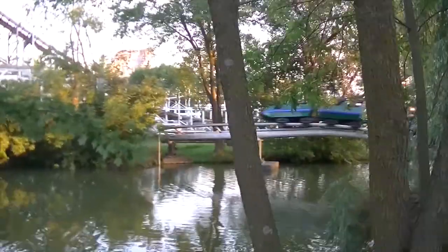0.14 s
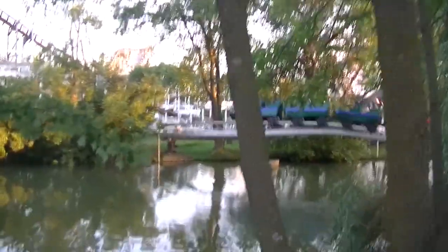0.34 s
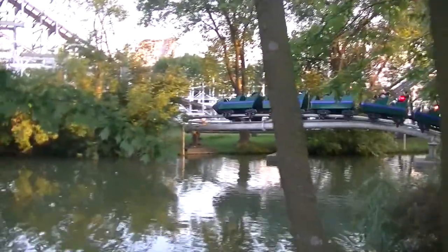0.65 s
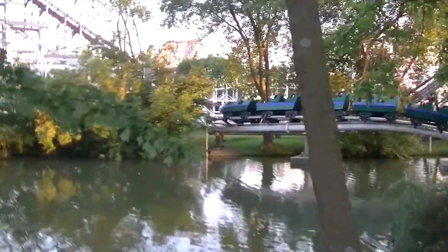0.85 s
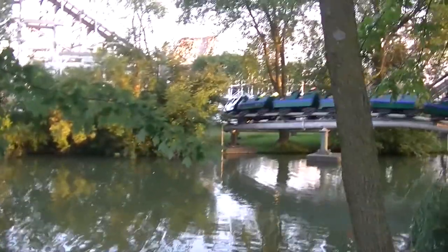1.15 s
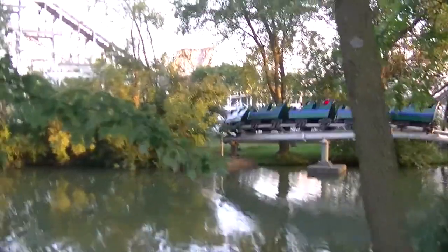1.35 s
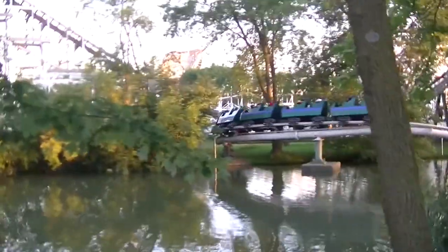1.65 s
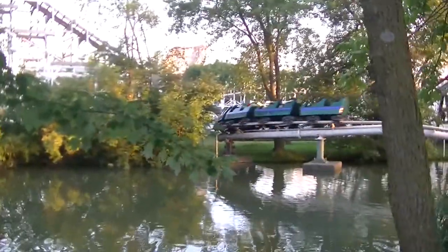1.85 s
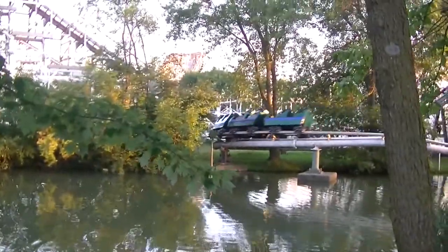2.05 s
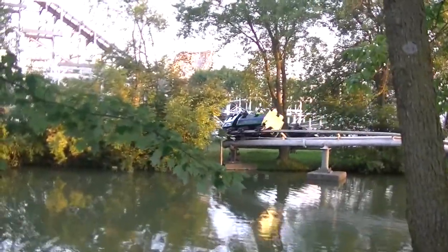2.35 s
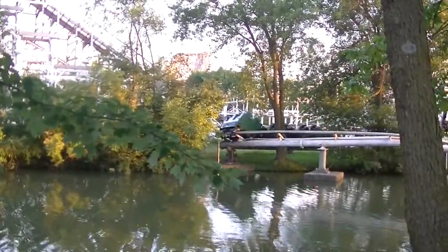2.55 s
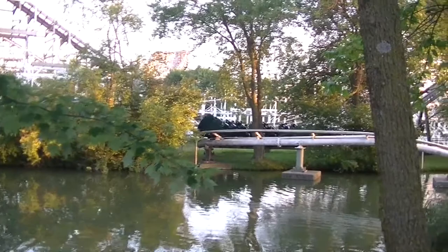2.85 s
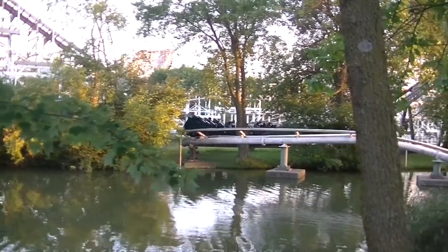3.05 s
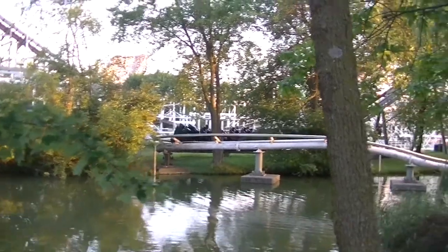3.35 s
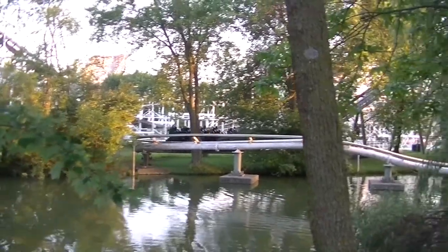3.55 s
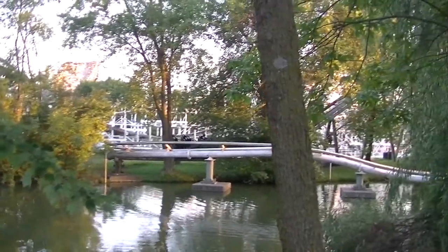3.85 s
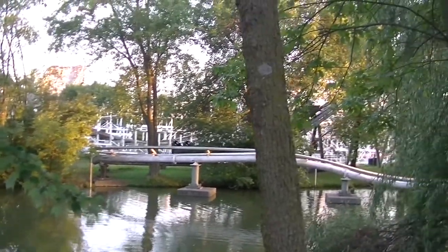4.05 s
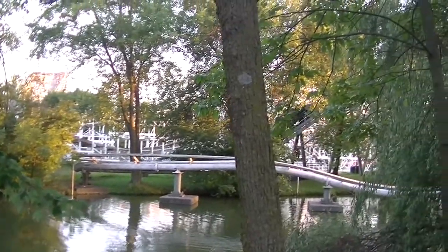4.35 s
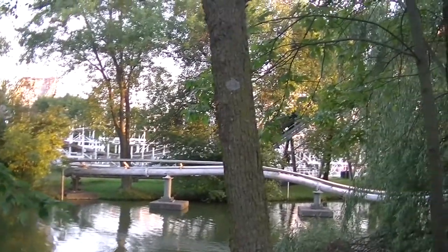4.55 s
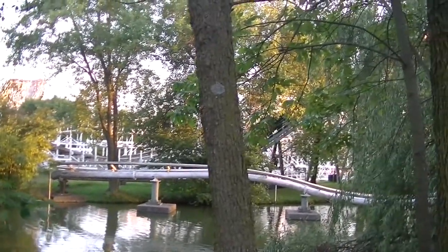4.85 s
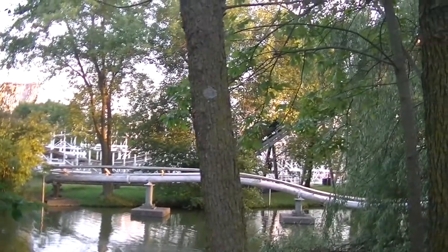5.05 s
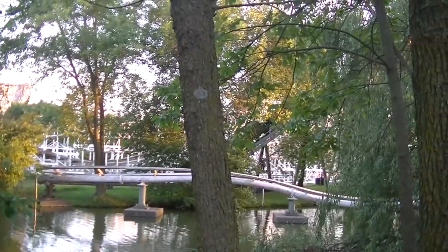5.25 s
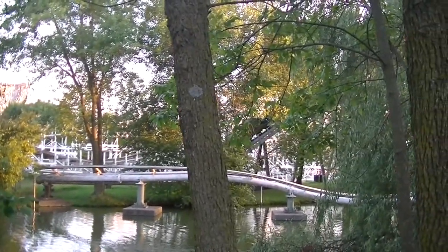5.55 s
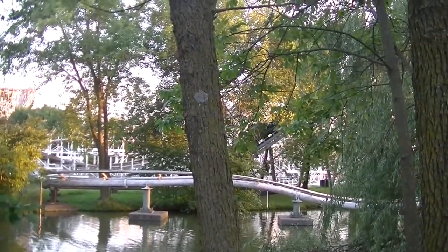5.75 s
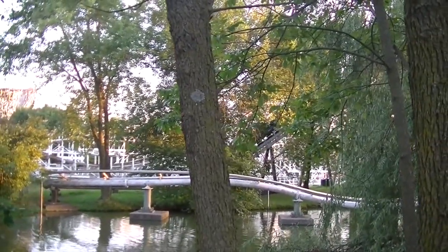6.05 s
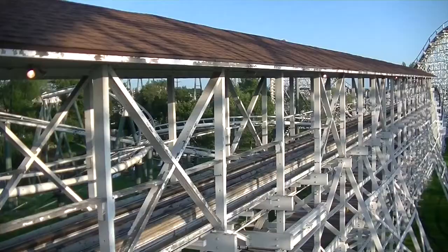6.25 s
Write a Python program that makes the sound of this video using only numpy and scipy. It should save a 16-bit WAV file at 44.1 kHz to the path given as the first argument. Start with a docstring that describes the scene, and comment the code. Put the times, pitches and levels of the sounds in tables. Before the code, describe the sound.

From the start, a roller coaster train gives a dense, bright metallic hiss over muffled roar and soft low rumble, with a ratchet clanking about ten times a second, each blow doubled by a small bounce. From 0.6 s fine treble fizz swells and supports hum. Between 1 and 2 s the hiss surges and hard, short-ringing steel clanks crowd together, with broad knocks at rail joints near 0.8, 0.9, 1.5 and 2.1 s. Around 2.4 s the fizz fades and the sound dulls and eases, the ratchet continuing. Near 4 s clanks and knocks return; a high rail sings fitfully until about 5 s while wheels drone low and fade. A thin wheel squeal sinks slightly at 5.4-5.8 s. Hiss and rumble lift near 5.95 s; at 6.3 s the clatter drops sharply. Open air, faint scattered echoes, near-central stereo.

```python
"""A roller coaster train rolls along a steel track, heard through trees.
From the start a ratchet clanks about ten times a second as impacts ring the modes of the track, over a
hiss of many contacts and low rolling noise; harder clanks, fizz, humming supports and joint knocks follow.
Near 4 s wheels drone and a rail sings by rubbing, later a wheel squeals; at 6.3 s the clatter drops away."""
import sys
import numpy as np
from scipy import signal
from scipy.fft import rfft, irfft
from scipy.io import wavfile

SR = 44100
rng = np.random.default_rng(int(sys.argv[2]) if len(sys.argv) > 2 else 0)


def log_audio(samples):
    """Write samples as a 16-bit WAV file to the path given in sys.argv[1]."""
    # one column per channel
    frames = np.atleast_2d(samples).T
    # limit to full scale, then quantise
    limited = np.clip(frames, -1, 1)
    pcm = np.round(limited * 32767).astype(np.int16)
    wavfile.write(sys.argv[1], SR, pcm)


N = 282486
TIME = np.arange(N) / SR
FREQS = np.fft.rfftfreq(N, 1 / SR)
DROP_S, DROP_DB = 6.303, -9
# the cars are in the open between these times
OPEN_S, HIDDEN_S = 0.59, 2.37


def amp(db):
    """Level: converts decibels to an amplitude ratio."""
    return 10 ** (np.asarray(db) / 20)


def unit(x):
    """Normalization: scales a signal to rms 1."""
    return x / np.sqrt(np.mean(x ** 2) + 1e-20)


def curve(rows):
    """Linear interpolation: a table of t/s and value, read at every sample."""
    times, values = np.transpose(rows)
    return np.interp(TIME, times, values)


def across(points):
    """Logarithmic interpolation: a table of f/Hz and value, read at every frequency bin."""
    hz, value = np.transpose(points)
    return np.interp(np.log(FREQS + 1), np.log(hz), value)


def colour(x, spectrum):
    """Linear filtering: shapes white input by a spectrum and keeps its power."""
    return irfft(rfft(x) * unit(amp(across(spectrum))), N)


def wander(rate_hz):
    """Random modulation: noise through a Gaussian low-pass, rms 1."""
    lowpass = np.exp(-(FREQS / rate_hz) ** 2 / 2)
    return unit(irfft(rfft(rng.standard_normal(N)) * lowpass, N))


def contacts(per_s, spread_db):
    """Shot noise: a dense random train of tiny impacts of uneven size and sign, rms 1."""
    size = amp(spread_db * rng.random(N))
    sign = rng.choice([-1, 1], N)
    return unit(size * sign * (rng.random(N) < per_s / SR))


def burst(s, rise, decay):
    """Impact envelope: the samples a blow at s lasts, and its rise and exponential decay of peak 1."""
    start = max(round(s * SR), 0)
    age = TIME[:min(N - start, SR // 2)]
    shape = (1 - np.exp(-age / rise)) * np.exp(-age / max(decay, rise))
    return slice(start, start + len(age)), shape / shape.max()


def sustain(start, end, rise, release=.04):
    """Exponential onset and release: rises towards 1 from start and dies away after end."""
    onset = 1 - np.exp(-np.maximum(TIME - start, 0) / rise)
    return onset * np.exp(-np.maximum(TIME - end, 0) / release)


def tone(hz, width_hz):
    """Narrow-band noise: a resonance kept going by rubbing, a fuzzy line of rms 1 that follows its pitch."""
    phase = 2 * np.pi * np.cumsum(hz * np.ones(N)) / SR
    return unit(wander(width_hz) * np.cos(phase) + wander(width_hz) * np.sin(phase))


def mode(hz, width):
    """Resonance: a squared band-pass response, which gives one mode steep skirts."""
    return (1j * FREQS * width / (hz ** 2 - FREQS ** 2 + 1j * FREQS * width)) ** 2


# modes of the track steel: f/Hz, width/Hz, relative level/dB
TRACK_MODES = [(2270, 150, 1.5), (2731, 140, 5.5), (3532, 100, 7.5), (3920, 59, 9.5), (4455, 100, -0.5),
               (4720, 114, 6), (5060, 200, 0.5), (5450, 150, -11), (6580, 180, -1)]


def steel(x):
    """Modal superposition: white input rings the track modes and keeps its power."""
    response = sum(amp(db) * mode(hz, width) for hz, width, db in TRACK_MODES)
    return irfft(rfft(x) * response / np.sqrt(np.mean(abs(response) ** 2)), N)


# spectrum of the impact of steel on steel: f/Hz, relative level/dB
CLANK_SPECTRUM = [(60, -60), (500, -18), (1400, -12), (2200, 5.5), (3200, 3), (4600, 8), (5400, 4),
                  (6600, -4.5), (7400, -17), (9700, -16.5), (10800, -23), (15500, -36)]


def clanks(rows, level_db, rise, decay, track_db, ring_db, ring_decay, ring_rise=0.0019, rough=0.43):
    """Impact excitation: a quick chatter of contacts shakes the track and leaves one part ringing."""
    power, ring = np.zeros((2, N))
    buzz = 1 + rough * (wander(rate_hz=37) + 1j * wander(rate_hz=110))  # the part rattles as it rings
    buzz /= np.sqrt(np.mean(abs(buzz) ** 2))
    for (s, db, hz, part_db), phase in zip(rows, rng.random(len(rows))):
        span, shape = burst(s, rise, decay)
        power[span] += (amp(db + level_db) * shape) ** 2
        span, shape = burst(s, ring_rise, ring_decay)
        carrier = np.exp(2j * np.pi * (hz * TIME[span] + phase))
        ring[span] += amp(part_db + ring_db) * shape * (buzz[span] * carrier).real
    envelope = np.sqrt(power)
    crack = colour(envelope * contacts(per_s=4000, spread_db=1.5), CLANK_SPECTRUM)
    track = steel(envelope * rng.standard_normal(N))
    return crack + amp(track_db) * track + ring


def teeth(first_s=.037, spacing_s=.09728, slowing_s=.0000084):
    """Near-periodic motion: times the pawl drops, the spacing growing by slowing_s with each tooth."""
    tooth = np.arange(int(TIME[-1] / spacing_s) + 1)
    return first_s + tooth * (spacing_s + slowing_s * tooth / 2)


# strength of the ratchet: t/s, relative level/dB
RATCHET_STRENGTH = [(0, -23), (.85, -18.5), (1.15, -20.5), (2.5, -23), (3.05, -18.5), (4.2, -22.5),
                    (5.2, -21.5), (6.2, -23.5)]


def ratchet(jitter_s=0.00081, uneven_db=1.0, ring_uneven_db=2, detune=.01):
    """Repeated impact: the pawl drops and bounces once per tooth; each blow rings a mode, strong ones oftenest."""
    times = teeth()[teeth() < DROP_S]
    mode_hz, _, mode_db = np.transpose(TRACK_MODES)
    cumulative_odds = np.cumsum(amp(mode_db)) / amp(mode_db).sum()
    drop_and_bounce = [(0, 0), (0.018, -6.5)]  # delay/s, level/dB
    rows = []
    for s in times:
        force_db = np.interp(s, *np.transpose(RATCHET_STRENGTH))
        for delay, loss_db in drop_and_bounce:
            late, hard, ringing, off = rng.standard_normal(4)
            db = force_db + loss_db + uneven_db * hard
            hz = mode_hz[np.searchsorted(cumulative_odds, rng.random())] * (1 + detune * off)
            rows.append((s + delay + jitter_s * late, db, hz, db + ring_uneven_db * ringing))
    return clanks(rows, level_db=-2.0, rise=0.00081, decay=0.029, track_db=-2.5, ring_db=-5.0, ring_decay=0.046)


# hardest clanks of steel on steel: t/s, relative level/dB, f/Hz of the part left ringing, its relative level/dB
HARD_CLANKS = [(.325, -32, 5010, -20.5), (.523, -30, 3570, -28), (.717, -21, 3550, -22),
               (1.007, -16, 4720, -25), (1.173, -19, 3620, -16), (1.2, -25, 2760, -18.5),
               (1.242, -15.5, 2900, -30), (1.442, -15, 5070, -16.5), (1.489, -16, 2710, -19),
               (1.545, -19.5, 5140, -20), (1.59, -20, 3940, -18.5), (1.737, -14.5, 3940, -20),
               (1.789, -31, 3960, -18.5), (1.863, -15, 4520, -34), (1.991, -25, 5300, -23),
               (2.15, -21, 2207, -28), (2.761, -22, 4710, -32), (3.15, -25, 3690, -23),
               (3.344, -25, 2680, -28), (3.928, -16, 4050, -35.5), (4.028, -20.5, 3500, -27),
               (4.228, -18.5, 3600, -26), (4.487, -17.5, 3490, -29), (4.7, -19, 3560, -20),
               (5.106, -22, 2760, -26), (5.42, -20, 3430, -22), (5.844, -22.5, 2330, -29)]


def hard_clanks():
    """Impact excitation: the hardest clanks of steel on steel, many of them hard ratchet blows."""
    return clanks(HARD_CLANKS, level_db=0.25, rise=.0008, decay=0.04, track_db=-6,
                  ring_db=4.0, ring_decay=0.035, ring_rise=0.00063)


# how loudly the wheels run, followed by both hiss and roar: t/s, relative level/dB
RUNNING_LEVEL = [(0, -21.5), (.75, -20.5), (1, -15.5), (1.14, -18.5), (1.28, -15), (1.55, -16.5),
                 (2.42, -17), (2.56, -20.5), (3.15, -20), (3.8, -21), (4.02, -16.5), (4.2, -20.5),
                 (4.6, -18), (5.08, -21), (5.75, -21), (5.95, -18), (6.3, -21)]
# spectrum of the wheel and chain contacts: f/Hz, relative level/dB
HISS_SPECTRUM = [(600, -42.5), (1400, -14.5), (2150, -4.5), (3200, -3), (4400, -.5), (5200, 0), (5700, -4),
                 (6500, -6.5), (7100, -13), (8200, -19), (9700, -21.5), (10700, -30.5), (12500, -33.5),
                 (15500, -43)]


def hiss(level_db=-1.1, ring_db=-10.5, flutter_db=0.75, ring_flutter_db=1.4, surge_db=0.23, surge_lag_s=0.029):
    """Shot noise: countless contacts of wheels and chain surge after each tooth; the track rings in fits."""
    turns = np.interp(TIME - surge_lag_s, teeth(), np.arange(len(teeth())))
    surge = surge_db * np.cos(2 * np.pi * turns)
    level = amp(curve(RUNNING_LEVEL) + level_db + surge + flutter_db * wander(rate_hz=19))
    fits = amp(ring_db + ring_flutter_db * np.tanh(wander(rate_hz=3.2)))
    track = steel(level * fits * rng.standard_normal(N))
    return colour(level * contacts(per_s=12000, spread_db=6.5), HISS_SPECTRUM) + track


# cars knocking over rail joints: t/s, relative peak level/dB, decay/s,
# f/Hz of the car body's boom, boom level relative to the knock/dB
JOINT_KNOCKS = [(.809, -18, 0.03, 610, -10), (.913, -17.5, 0.056, 695, -6.5),
                (1.239, -25.5, 0.022, 800, -1.5), (1.549, -21.5, .083, 770, -10),
                (2.147, -17.5, 0.029, 645, -18), (2.358, -20.5, 0.036, 227, -6),
                (3.909, -22.5, .074, 506, -23), (3.988, -20.5, .08, 961, -17),
                (4.363, -26.5, 0.021, 1030, -1), (4.427, -18.5, 0.047, 560, -7.5),
                (4.467, -23, 0.026, 960, -3), (4.706, -25.5, 0.042, 990, -14), (5.414, -30, 0.038, 900, -5),
                (5.838, -21, 0.057, 550, -17), (6.215, -22.5, 0.036, 530, -3), (6.24, -29, 0.025, 800, 0)]
# spectrum of the clatter at a joint: f/Hz, relative level/dB
KNOCK_SPECTRUM = [(40, -50), (90, -21), (220, -5.5), (600, -6.5), (1000, 0), (1350, -1), (2100, 9),
                  (3500, -7), (6000, -4), (9500, -10), (15000, -41)]


def knocks(level_db=-4, rise=0.0076, boom_db=-5.0, boom_width=0.38):
    """Impact and damped resonance: wheels drop over a joint with a broad clatter, and the car body booms."""
    power, boom = np.zeros((2, N))
    half_band = 1 + boom_width / 2
    for s, db, decay, hz, body_db in JOINT_KNOCKS:
        span, shape = burst(s, rise, decay)
        power[span] += (amp(db + level_db) * shape) ** 2
        body = signal.butter(2, [hz / half_band, hz * half_band], "band", fs=SR, output="sos")
        resonance = unit(signal.sosfilt(body, rng.standard_normal(len(shape))))
        boom[span] += amp(db + body_db + boom_db) * shape * resonance
    return colour(np.sqrt(power) * contacts(per_s=5000, spread_db=10), KNOCK_SPECTRUM) + boom


def rubbed(start, end, hz, sag, db, fade, width_hz, release, ratio=1, rise=0.012):
    """Friction-driven vibration: a note of rubbed steel sets in quickly, then sinks in pitch and level."""
    age = np.maximum(TIME - start, 0)
    level = amp(db - fade * age) * sustain(start, end, rise, release)
    return tone(ratio * (hz - sag * age), width_hz) * level


# partials of the singing rail: frequency ratio, relative level/dB
RAIL_PARTIALS = [(1, -1), (.781, -8), (1.122, -7.5), (1.449, -6)]
# rubbed rail and squealing wheel: start t/s, end t/s, f/Hz, sag/(Hz/s), relative level/dB, fade/(dB/s)
RAIL_NOTE = (3.95, 4.85, 3520, 10, -24.3, 3)
WHEEL_SQUEAL = (5.42, 5.81, 1757, 45, -35.5, 9)


def singing(fitful_db=2.5):
    """Friction-driven vibration: the rail sings in fits with several partials; one wheel squeals thinly."""
    rail = sum(amp(db) * rubbed(*RAIL_NOTE, width_hz=65, release=.45, ratio=ratio) for ratio, db in RAIL_PARTIALS)
    squeal = rubbed(*WHEEL_SQUEAL, width_hz=6, release=.04)
    return rail * amp(fitful_db * np.tanh(wander(rate_hz=10))) + squeal


# spectrum of the finest treble: f/Hz, relative level/dB
FIZZ_SPECTRUM = [(3000, -40), (6500, -20), (9600, 9), (10800, -2), (12800, -3), (15500, -30)]


def fizz(level_db=-40):
    """Shot noise and screening: the wheels' finest treble swells in, then dies as bushes hide the cars."""
    treble = colour(contacts(per_s=5000, spread_db=10), FIZZ_SPECTRUM)
    return treble * amp(level_db) * sustain(OPEN_S, HIDDEN_S, rise=0.5, release=0.21)


# spectra of the wheels' roar and the supports' rumble: f/Hz, relative level/dB
ROAR_SPECTRUM = [(40, -55), (150, -24), (330, -4.5), (490, 3.5), (700, 2), (850, 0.5), (1000, 3.5),
                 (1250, -4), (1700, -3.5), (3000, -62), (9000, -46)]
RUMBLE_SPECTRUM = [(20, -38), (62, -35), (80, -23), (100, -16.5), (125, -7.5), (150, -6), (185, 1),
                   (240, 0), (320, 0), (450, -7), (900, -23), (4000, -70)]
# rumble of the supports: t/s, level/dB
SUPPORT_RUMBLE = [(0, -43.5), (1, -40), (2.3, -38.5), (4.1, -41.5), (4.6, -46), (5.6, -49.5), (5.95, -41.5),
                  (6.3, -45)]


def rolling(roar_db=-19.0, open_db=1, lumpy_db=-0.04):
    """Rolling noise: rough contact makes the wheels roar on the rails and the supports rumble under them."""
    roar_level = amp(curve(RUNNING_LEVEL) + roar_db + open_db * sustain(OPEN_S, HIDDEN_S, rise=.05))
    roar = colour(contacts(per_s=5000, spread_db=7.5), ROAR_SPECTRUM) * roar_level
    rumble = colour(rng.standard_normal(N), RUMBLE_SPECTRUM) * amp(curve(SUPPORT_RUMBLE))
    return roar * amp(lumpy_db * wander(rate_hz=10)) + rumble


# supports humming under the train: start t/s, end t/s, f/Hz, level/dB
HUMMING_SUPPORTS = [(.6, 2.5, 240, -45), (2.6, 4.2, 188, -47.5), (5.35, 5.85, 200, -49)]
# pitch of the droning wheels, which rises and falls with their speed: t/s, f/Hz
DRONE_PITCH = [(4.05, 439.6), (4.45, 478), (4.8, 469), (5.35, 389), (6.2, 422)]


def droning(start_s=3.8, level_db=-38, fade_db_per_s=4.5):
    """Resonance: one support after another hums under the train; the wheels drone as it runs off."""
    hum = sum(amp(db) * tone(hz, width_hz=28) * sustain(start, end, rise=0.04)
              for start, end, hz, db in HUMMING_SUPPORTS)
    level = amp(level_db - fade_db_per_s * (TIME - start_s)) * sustain(start_s, TIME[-1], rise=.07)
    return hum + level * tone(curve(DRONE_PITCH), width_hz=70)


# brightness of the metal: t/s, gain one octave above the pivot/dB
METAL_BRIGHTNESS = [(0, .8), (1.8, 0.56), (2.4, -1), (3.5, 0), (6.3, -0.85)]


def brighten(x, pivot_hz=4000):
    """Spectral tilt: the balance turns about a pivot as the brightness changes."""
    octaves = np.log2(np.clip(FREQS / pivot_hz, 1 / 2, 4))
    return x + (amp(curve(METAL_BRIGHTNESS)) - 1) * irfft(rfft(x) * octaves, N)


def scatter(x, t60):
    """Diffuse reflection: trunks and trestles return many faint echoes, equally strong at all frequencies."""
    age = TIME[:SR // 2]
    taps = rfft(rng.standard_normal(len(age)) * amp(-60 * age / t60))
    return signal.fftconvolve(x, irfft(taps / abs(taps)))[:N]


# two close receivers: f/Hz, likeness (0 to 1)
PORT_LIKENESS = [(60, .6), (130, .93), (290, .78), (640, .65), (1410, .78), (3100, .91), (4200, .965),
                 (6820, .96), (15000, .97)]
# f/Hz, left minus right level/dB
PORT_LEAN = [(30, 0), (92, 8), (140, 10), (210, 9.5), (330, 8), (500, 4.5), (1170, -1), (1790, -3.5),
             (2740, -3.5), (4190, -.5), (6410, 0)]
# f/Hz, phase by which left leads/rad
PORT_LEAD = [(100, -.2), (250, -.3), (430, -.6), (780, -.7), (1460, -.5), (2070, -.3), (3450, .08),
             (6290, -.06), (8100, 0)]


def ports(x):
    """Spatial coherence: two close ports hear nearly the same sound, level and phase differing by frequency."""
    same = np.clip(across(PORT_LIKENESS), 0, 1)
    common = rfft(x) * np.sqrt((1 + same) / 2)
    diffuse = rfft(scatter(x, t60=.3)) * np.sqrt((1 - same) / 2)
    # half of each difference goes to either side
    lean = amp(across(PORT_LEAN) / 2) * np.exp(.5j * across(PORT_LEAD))
    pair = np.array([(common + diffuse) * lean, (common - diffuse) / lean])
    return irfft(pair / (abs(lean + 1 / lean) / 2), N)


def scene(echo_db=-12):
    """Superposition: the clatter and its echoes drop abruptly near the end, over the low rolling and drone."""
    blows = brighten(ratchet()) + hard_clanks() + knocks()
    echoes = amp(echo_db) * scatter(blows, t60=0.38)
    metal = blows + echoes + brighten(hiss()) + fizz() + singing()
    metal *= amp(np.interp(TIME, [DROP_S - .004, DROP_S + 0.0053], [0, DROP_DB]))
    return ports(metal + rolling() + droning())


def record(dry):
    """Clipping and band limiting: flattens any peaks beyond 0.92, then low-passes at 15.7 kHz."""
    clipped = np.clip(dry, -.92, .92)
    lowpass = signal.firwin(511, 15700, window=("kaiser", 9), fs=SR)
    return signal.oaconvolve(clipped, lowpass[None], "same")


dry = scene()
out = record(dry)
log_audio(out)
```